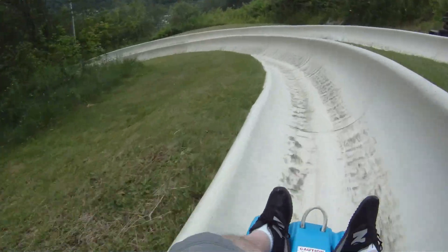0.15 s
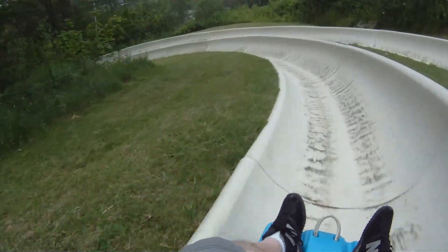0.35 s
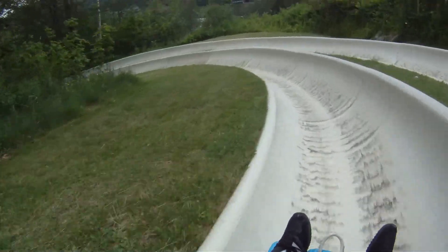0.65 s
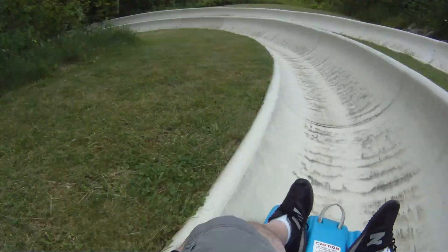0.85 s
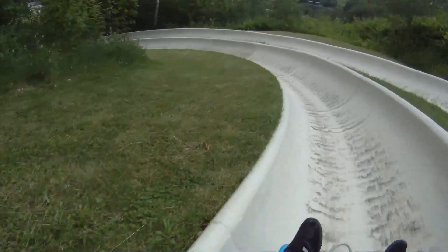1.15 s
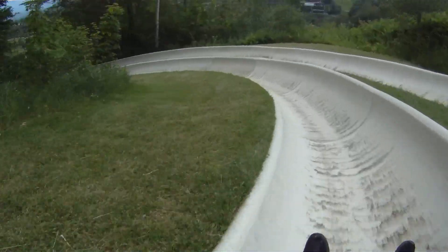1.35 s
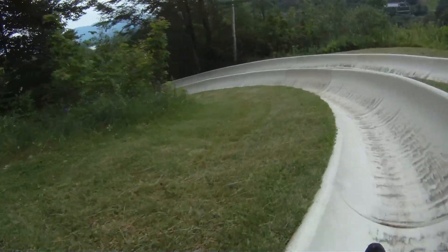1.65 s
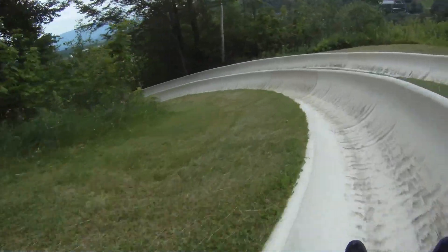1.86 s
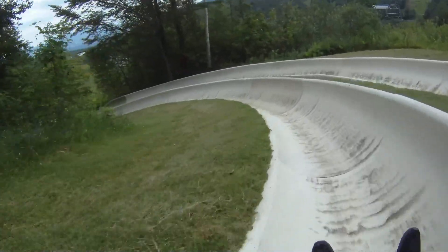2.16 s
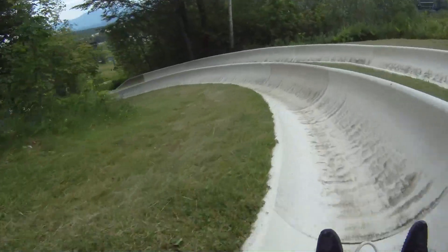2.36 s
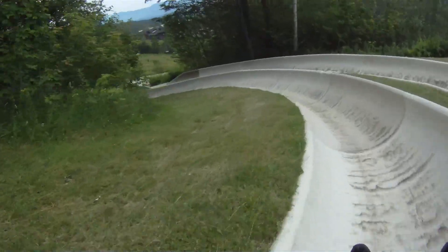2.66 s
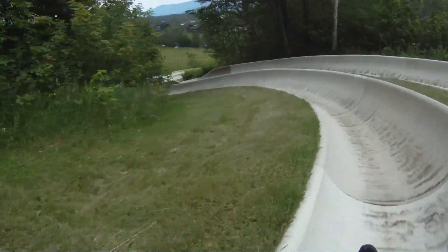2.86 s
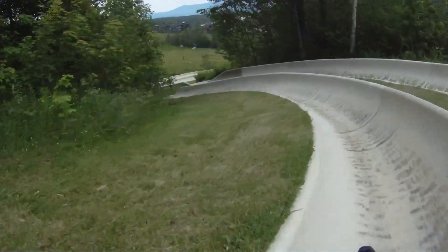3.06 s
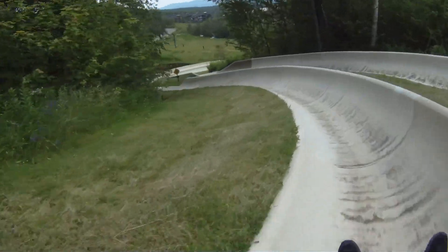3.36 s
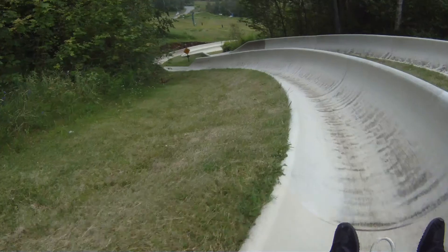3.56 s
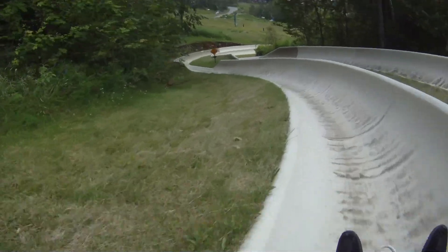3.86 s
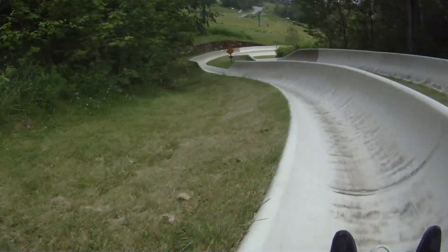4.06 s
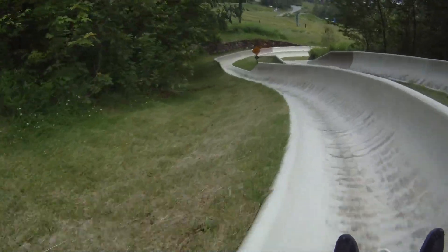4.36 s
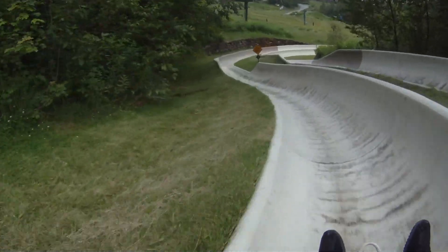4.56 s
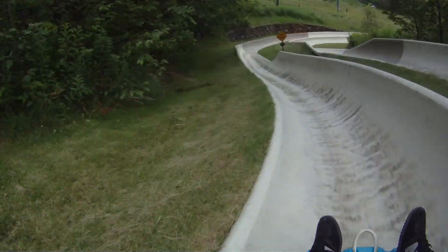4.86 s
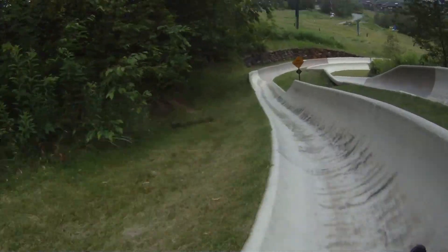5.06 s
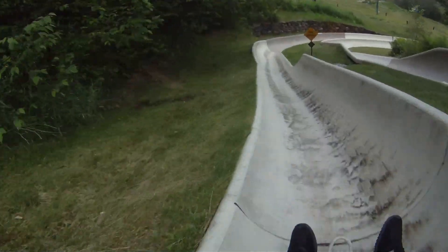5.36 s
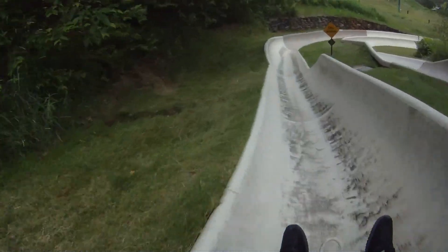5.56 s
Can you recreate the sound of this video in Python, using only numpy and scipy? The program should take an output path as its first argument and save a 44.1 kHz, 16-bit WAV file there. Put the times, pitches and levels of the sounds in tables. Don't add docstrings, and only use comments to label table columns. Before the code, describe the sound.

A plastic sled slides down a hard cement chute on an open hillside, heard from a small microphone in a closed case close to the rider. The sound is dry, boxy and midrange-heavy, with a coarse metallic edge on top. A hard hollow knock opens at once, followed by a dull thump at 0.1 s and a small clack at 0.2 s. A weak, dull joint passes at 0.6 s. From 1.3 s the knocks become loud and sharp, at about 1.3, 2.0, 2.6, 3.2, 3.8 and 4.4 s, each trailed by a seat thump and bright double clack within two tenths of a second. Loose fittings chatter briefly after them. Between blows, gritty runners scrape quietly and unevenly, with scattered ticks, deep wobbling and faint air rush. The joint at 5.0 s is softer, and the last, near 5.6 s, is faint and dull, while the scrape rises slightly.

```python
import sys
import numpy as np
from scipy import signal
from scipy.fft import rfft, irfft
from scipy.io import wavfile
from scipy.ndimage import uniform_filter1d

SR = 44100
rng = np.random.default_rng(int(sys.argv[2]) if len(sys.argv) > 2 else 0)


def gain_from_db(level_db):
    decades = np.asarray(level_db, float) / 20
    return 10 ** decades


def generate_wav(signal):
    frames = np.transpose(np.atleast_2d(signal))
    scaled = np.clip(frames, -1, 1) * 32767
    pcm = np.round(scaled).astype(np.int16)
    wavfile.write(sys.argv[1], SR, pcm)


N = 251370

# (time [s], strength [dB], brightness [dB], shake length [ms])
SEAT_THUMPS = [
    (0.125, -24.5, -2.5, 13),
    (0.733, -32, -5, 19),
    (1.414, -26, 1, 9.2),
    (2.07, -22, 0, 17),
    (2.696, -27.5, -0.3, 17),
    (3.309, -20.5, 1.5, 6.3),
    (3.896, -21, -2.5, 19),
    (4.485, -17.5, 1.5, 6.9),
    (5.194, -31, -5.5, 12),
    (5.681, -28, -3, 7.4),
]
# (frequency [Hz], level [dB], t60 [s])
AXLE_MODES = [(271, -14.5, 0.031), (898, 3, 0.0096), (1124, -4.5, 0.015), (2070, -5.5, 0.028),
              (2207, 9.5, 0.029), (2710, -12, 0.081), (3498, -3.5, 0.013), (3510, -4.5, 0.03)]


def unit(x):
    return x / np.sqrt(np.mean(x ** 2, axis=-1, keepdims=True))


def slope(x, order, hz, kind):
    return signal.sosfilt(signal.butter(order, hz, kind, fs=SR, output="sos"), x)


def band(x, lo_hz, hi_hz):
    return slope(x, 2, [lo_hz, hi_hz], "band")


def walk(rate):
    hold = int(SR / rate)
    steps = np.repeat(rng.standard_normal(N // hold + 1), hold)
    return 0.599 * uniform_filter1d(uniform_filter1d(steps, hold), hold)[:N]


def after(times, gains, rise_s, fade_s):
    since = np.maximum(np.arange(N) / SR - np.array(times)[:, None], 0)
    return np.asarray(gains) @ ((1 - np.exp(-since / rise_s)) * np.exp(-since / fade_s))


def body_response(size=4096):
    # (frequency [Hz], level [dB per Hz])
    tone = [(40, -19.5), (90, -1.5), (200, -5), (420, -5.5), (700, -5.5), (1300, -2), (1900, -1.5),
            (2800, -7), (3400, -12.5), (4200, -23), (5200, -22), (5700, -25.5), (6000, -59.5)]
    # (frequency [Hz], width [Hz], gain [dB])
    resonances = [(262.6, 173, 9), (792, 89, 4.5), (1068, 64, 4.5), (1300, 77, 4.5), (1589, 257, -21),
                  (2084, 380, 4), (2573, 120, 5), (3040, 430, -9.5), (3704, 216, 7), (4070, 114, 2),
                  (4760, 200, 1.5)]
    hz = np.maximum(np.arange(size + 1) * SR / (2 * size), 1)
    tone_hz, tone_db = np.transpose(tone)
    db = np.interp(np.log(hz), np.log(tone_hz), tone_db)
    for middle, width, gain in resonances:
        db = db + gain / (1 + (2 * (hz - middle) / max(width, 100.0)) ** 2)
    cepstrum = irfft(db * np.log(10) / 20)
    cepstrum[1:size] *= 2
    cepstrum[size + 1:] = 0
    return irfft(np.exp(rfft(cepstrum)))[:size]


def three_ways(x, bottom_hz, top_hz):
    # (thump to hull [Hz], hull to clack [Hz])
    split_hz = (430, 1620)
    upper = slope(x, 3, split_hz[0], "high")
    thump = slope(slope(x, 3, split_hz[0], "low"), 3, bottom_hz, "high")
    hull = slope(upper, 3, split_hz[1], "low")
    clack = slope(slope(upper, 3, split_hz[1], "high"), 3, top_hz, "low")
    return thump, hull, clack


def blows(table, body, modes, sign, clean, snap, twin, twin_ms, tail_db, tail_ms, lead_ms, trim_db, edges_hz,
          rise_ms, heft, dull):
    scatter_db, detune, grain_db = 1.5, 0.01, 1.2
    out = np.zeros(N + SR)
    ms = np.arange(SR // 7) * 1000 / SR
    s, hull_db, bright_db, shake_ms = np.transpose(table)[:, :, None]
    thump_db = heft * hull_db - dull * bright_db
    clack_db = hull_db + bright_db

    noise, bunch, size = rng.standard_normal((3, len(table), len(ms)))
    clumps = gain_from_db(2.0 * unit(band(bunch, 37, 120)))
    fade = np.exp(-ms / shake_ms) + gain_from_db(tail_db) * clumps * np.exp(-ms / tail_ms)
    shake = noise * gain_from_db(grain_db * size ** 2) * (1 - np.exp(-ms / rise_ms)) * fade
    chatter = signal.fftconvolve(shake, body[None], axes=1)[:, :len(ms)]

    ring = 0
    for hz, db, t60 in modes:
        off_tune, off_level = rng.standard_normal((2, len(table), 1))
        tone = np.sin(2 * np.pi * hz * (1 + detune * off_tune) * ms / 1000)
        ring = ring + gain_from_db(db + scatter_db * off_level) * tone * 1000 ** (-ms / 1000 / t60)
    ring = sign * ring * (1 - np.exp(-ms / (snap * rise_ms)))
    late = np.pad(ring, ((0, 0), (int(twin_ms * SR / 1000), 0)))[:, :len(ms)]
    ring = ring + twin * late

    parts = three_ways(clean * unit(ring) + (1 - clean) * unit(chatter), *edges_hz)
    for x, db, trim, lead in zip(parts, (thump_db, hull_db, clack_db), trim_db, (lead_ms, 0, 0)):
        rows = gain_from_db(db + trim) * x / np.abs(x).max(axis=1, keepdims=True)
        for start, row in zip(s[:, 0], rows):
            i = max(int((start - lead / 1000) * SR), 0)
            out[i:i + len(ms)] += row
    return out[:N]


def front_knocks(body):
    # (time [s], strength [dB], brightness [dB], shake length [ms])
    knocks = [
        (0.016, -4, 1, 4),
        (0.644, -19, -2, 9),
        (1.31, -1.5, 2, 4.2),
        (1.97, -2, 1, 3.1),
        (2.599, -2.5, 1, 3.4),
        (3.214, -1, -0.5, 9.3),
        (3.805, -0.6, 0, 3.3),
        (4.392, -1.3, 0.5, 8.4),
        (5.009, -12, -1, 4.9),
        (5.589, -20.5, -2.5, 3.5),
    ]
    # (frequency [Hz], level [dB], t60 [s])
    hull_modes = [(156, -13.5, 0.1), (264.7, 15, 0.071), (530, -53, 0.02), (768, 10.5, 0.019),
                  (1004, -2.5, 0.019), (1164, -8.5, 0.025), (1328, -1, 0.044), (2107, 6.5, 0.033),
                  (2390, -30, 0.14), (2520, -43, 0.015), (3150, -26, 0.1), (3384, -9.5, 0.041)]
    return blows(knocks, body, hull_modes, sign=-1, clean=0.63, snap=0.24, twin=0.23, twin_ms=2.403,
                 tail_db=-19.0, tail_ms=17.2, lead_ms=0, trim_db=(-4, 0, -4), edges_hz=(115, 4300),
                 rise_ms=0.73, heft=1.43, dull=1.0)


def rear_clacks(body):
    # (time [s], strength [dB], brightness [dB], shake length [ms])
    clacks = [
        (0.209, -19, -2, 3.2),
        (0.825, -28, -7, 27),
        (1.496, -17, -0.5, 2.6),
        (2.149, -15.5, 2.5, 5.2),
        (2.772, -17, 0, 5.1),
        (3.38, -16.5, -1, 5.7),
        (3.968, -14, -4, 6.7),
        (4.56, -22, 2, 6.5),
        (5.195, -23.5, 3, 14.4),
    ]
    return blows(clacks, body, AXLE_MODES, sign=1, clean=0.3, snap=0.59, twin=0.98, twin_ms=2.5,
                 tail_db=-26.5, tail_ms=57, lead_ms=0, trim_db=(-12, 0, 6), edges_hz=(90, 5400),
                 rise_ms=1.3, heft=1.02, dull=0.1)


def seat_thumps(body):
    # (frequency [Hz], level [dB], t60 [s])
    pan_modes = [(113, -1.5, 0.077), (164.6, 2.5, 0.043), (224, 9, 0.027), (1046, -13, 0.2),
                 (2311, 2, 0.039)]
    return blows(SEAT_THUMPS, body, pan_modes, sign=1, clean=0.49, snap=0.57, twin=0.2, twin_ms=4.0,
                 tail_db=-11, tail_ms=22.5, lead_ms=1.0, trim_db=(6.5, 0, 4), edges_hz=(60, 5200),
                 rise_ms=2.5, heft=1.06, dull=1.0)


def lasting(table, shake_ms):
    return np.column_stack([table, np.full(len(table), shake_ms)])


def rebounds(body):
    # (time [s], strength [dB], brightness [dB])
    landings = [
        (0.024, -28, 5.5),
        (0.23, -29.5, 0),
        (1.429, -24.5, -4.5),
        (1.445, -37, -6),
        (1.98, -18, -4),
        (3.816, -21.5, 2),
        (4.419, -26, 1.5),
    ]
    return blows(lasting(landings, 10.3), body, AXLE_MODES, sign=1, clean=0.031, snap=0.6, twin=0.3, twin_ms=2.46,
                 tail_db=-36, tail_ms=6.4, lead_ms=0, trim_db=(1.5, -1, 1.5), edges_hz=(90, 4500),
                 rise_ms=0.52, heft=0.96, dull=-0.79)


def ticks(body):
    # (time [s], strength [dB], brightness [dB])
    tick_table = [(0.136, -19.5, -1), (0.245, -23, 4), (0.495, -29, -9), (2.54, -43.5, 10),
                  (3.921, -30, -1), (0.653, -27, -18), (0.744, -25.5, -25), (1.237, -37.5, 3),
                  (1.534, -21.5, -21), (1.811, -32, -6), (1.903, -30, -4), (2.175, -26, -9),
                  (2.429, -35.5, 5.5), (2.45, -26.5, -7), (2.832, -38, 3), (2.97, -29.5, -3),
                  (3.063, -24, -2), (3.113, -32, 1), (3.444, -40.5, 12), (3.608, -30.5, -21),
                  (3.714, -30.5, -5), (3.994, -21, -4), (4.245, -28, -6), (4.295, -34, -3),
                  (4.578, -28, -4), (4.843, -28, -11), (4.893, -42.5, 10.5), (5.061, -30, 3),
                  (5.42, -44, 15.5), (5.443, -29, 0)]
    return blows(lasting(tick_table, 6.1), body, AXLE_MODES, sign=1, clean=0.29, snap=0.6, twin=0.37, twin_ms=2.43,
                 tail_db=-36, tail_ms=6.4, lead_ms=0, trim_db=(-12, -1, 0), edges_hz=(90, 5400),
                 rise_ms=0.61, heft=1.07, dull=0.077)


def scrape(body):
    # (time [s], scrape level [dB])
    pressure = [(0.0, -41.5), (0.16, -45), (0.4, -45.5), (0.53, -48), (0.63, -45), (0.8, -47),
                (0.92, -44.5), (1.1, -46.5), (1.8, -45), (2.3, -45), (3.1, -44), (3.5, -46), (4.3, -44.5),
                (4.75, -46), (4.95, -41.5), (5.15, -42), (5.36, -44), (5.7, -41.5)]
    # (middle [s], extra level [dB], length [s])
    drags = [
        (0.3, 1.5, .04),
        (0.614, 7, 0.04),
        (0.85, 3.5, 0.027),
        (1.25, 2, 0.027),
        (1.602, 2, 0.086),
        (2.86, 0.5, 0.021),
        (4.353, 3.5, .05),
        (4.646, 4, 0.083),
        (4.93, -1, .05),
    ]
    t = np.arange(N) / SR
    pressure_db = np.interp(t, *np.transpose(pressure))
    drag_db = sum(db * np.exp(-((t - s) / length) ** 2) for s, db, length in drags)

    seat_s, seat_db = np.transpose(SEAT_THUMPS)[:2]
    shudder_db = 12.5 * after(seat_s, gain_from_db(1.2 * (seat_db + 22)), rise_s=0.01, fade_s=0.077)
    pressure_db = pressure_db + 3 * after(seat_s, gain_from_db(0.5 * (seat_db + 18)), rise_s=0.0067, fade_s=0.04)

    rumble_db = 0.54 * (pressure_db + 41.5) - 47 + shudder_db
    hull_db = pressure_db - 1.5 + 0.18 * drag_db
    hiss_db = pressure_db - 0.5 + drag_db

    grit = rng.standard_normal(N) * gain_from_db(3.05 * np.minimum(rng.exponential(1, N), 7))
    flutter = gain_from_db(0.7 * walk(12) + 4.04 * walk(60) + 1.5 * walk(230))
    flares = 1 + 0.58 * np.maximum(walk(35) - 0.8, 0)
    parts = three_ways(signal.fftconvolve(grit * flutter * flares, body)[:N], 50, 6260)
    slide = np.zeros(N)
    for x, db in zip(parts, (rumble_db, hull_db, hiss_db)):
        slide += unit(x) * gain_from_db(db + 0.49 * walk(26.4) + 2.4 * walk(90))
    return slide


def sway():
    # (time [s], strength [dB])
    lurches = [(0.02, -37), (0.13, -30), (0.27, -37.5), (0.52, -45), (0.64, -37.5), (0.78, -48), (1.2, -42),
               (1.34, -38), (1.46, -35), (1.56, -40), (1.83, -43), (2.08, -38), (2.17, -47), (2.71, -35),
               (2.83, -38), (3.1, -46), (3.23, -37), (3.32, -38.5), (3.42, -44), (3.91, -32), (3.99, -33),
               (4.33, -45), (4.5, -34), (4.58, -38.5), (5.08, -46), (5.21, -38)]
    lurch_s, lurch_db = np.transpose(lurches)
    swell = gain_from_db(-57) + 1.9 * after(lurch_s, gain_from_db(lurch_db), rise_s=0.019, fade_s=0.037)
    hz = 27 * (1 + 0.198 * walk(9))
    bob = np.sqrt(2) * np.sin(2 * np.pi * np.cumsum(hz) / SR) * gain_from_db(3 * walk(11))
    wobble = unit(band(band(rng.standard_normal(N), 20.5, 42), 20.5, 42))
    return band((bob + 0.82 * wobble) * swell, 14, 56)


def wind():
    return unit(band(rng.standard_normal(N), 810, 4750)) * gain_from_db(-57.0 + 0.91 * walk(1.6))


def scene():
    body = body_response()
    joints = front_knocks(body) + seat_thumps(body) + rear_clacks(body)
    loose = rebounds(body) + ticks(body)
    return (joints + loose + scrape(body) + sway() + wind())[None]


def roll_off(x):
    return signal.sosfilt(signal.butter(12, 16340, fs=SR, output="sos"), x)


def record(dry):
    rounded = dry / (1 + np.abs(dry / 0.97) ** 4) ** 0.25
    coarse = signal.resample_poly(rounded, 40, 147, axis=1)
    held = signal.resample_poly(np.repeat(coarse, 4, axis=1), 147, 160, axis=1)[:, :N]
    top_cut = signal.ellip(8, 0.2, 42, 15230, fs=SR, output="sos")
    return roll_off(signal.sosfilt(top_cut, held))


dry = scene()
out = record(dry)
generate_wav(out)
```